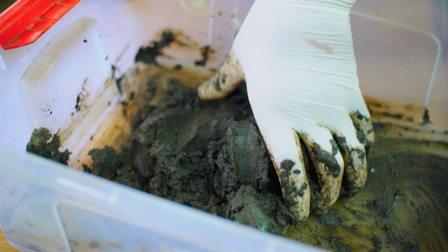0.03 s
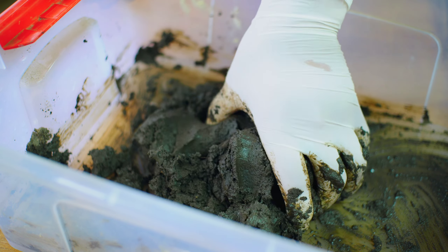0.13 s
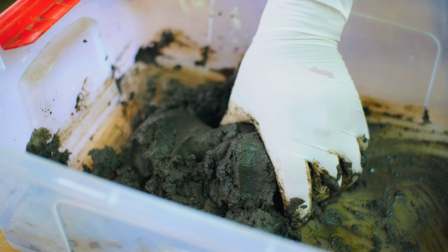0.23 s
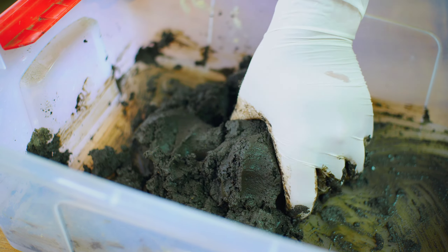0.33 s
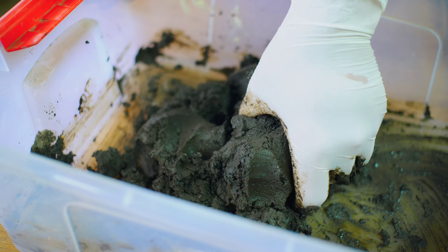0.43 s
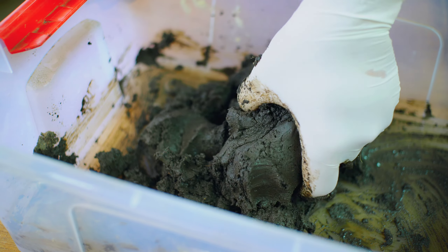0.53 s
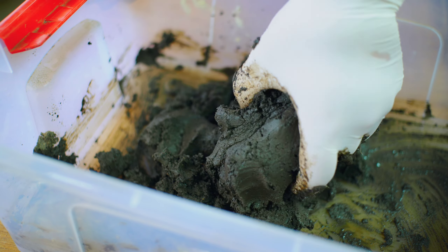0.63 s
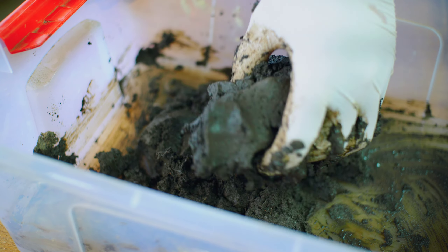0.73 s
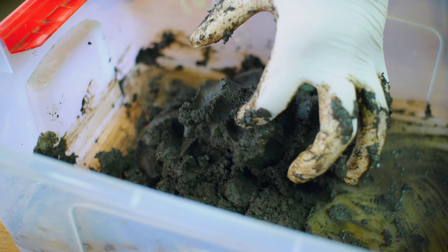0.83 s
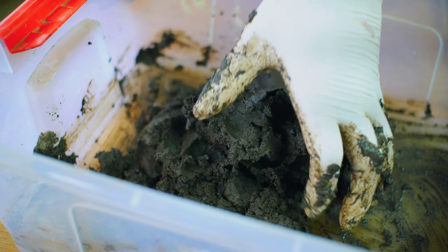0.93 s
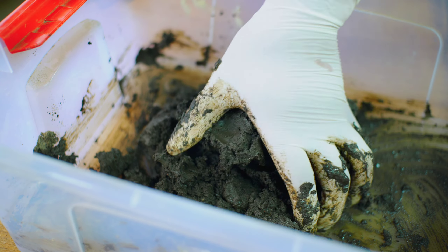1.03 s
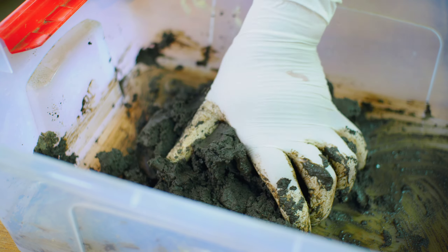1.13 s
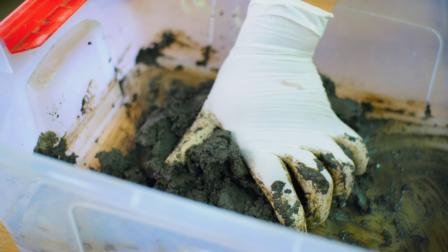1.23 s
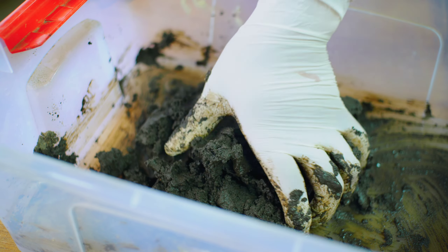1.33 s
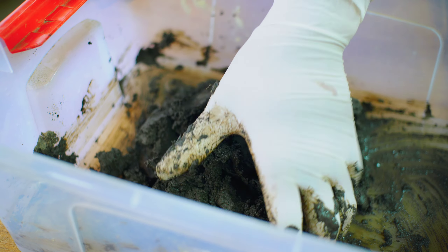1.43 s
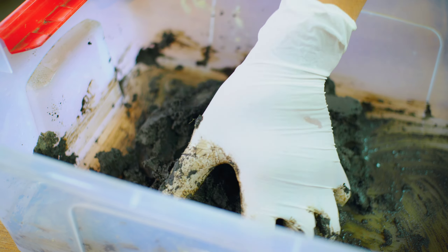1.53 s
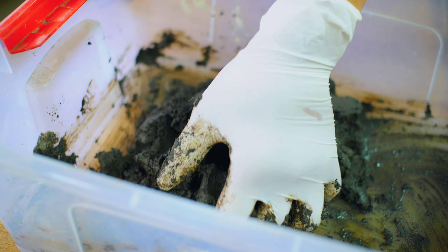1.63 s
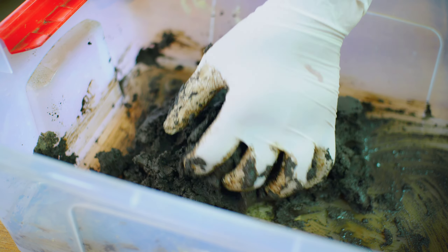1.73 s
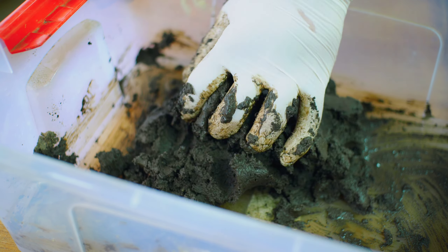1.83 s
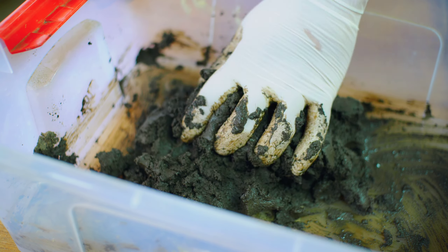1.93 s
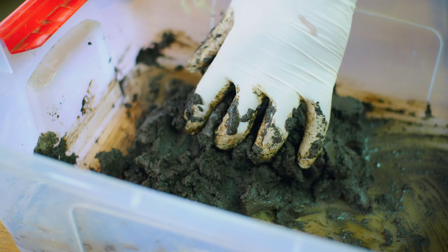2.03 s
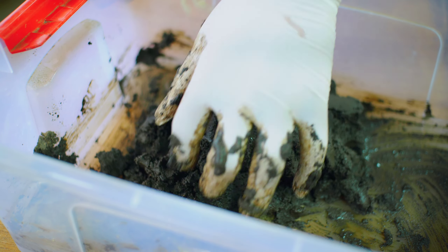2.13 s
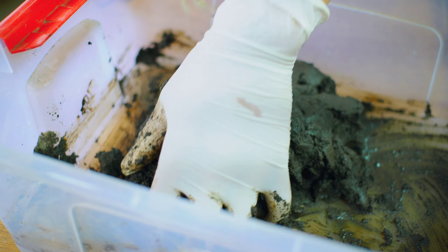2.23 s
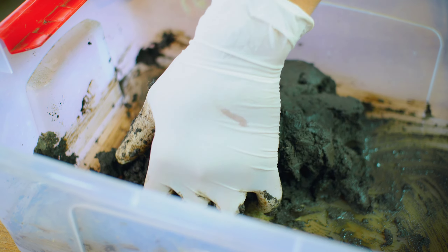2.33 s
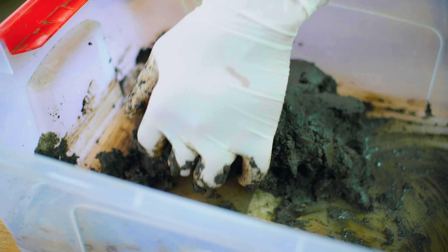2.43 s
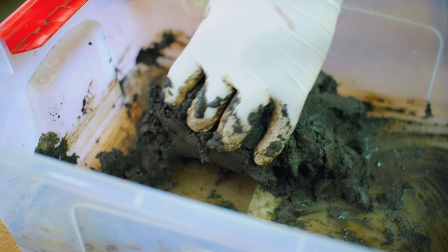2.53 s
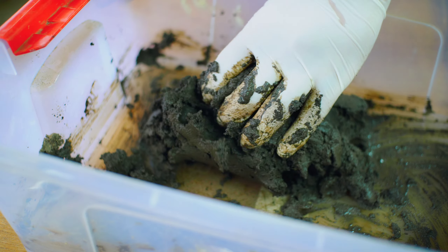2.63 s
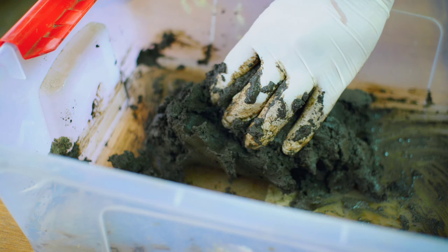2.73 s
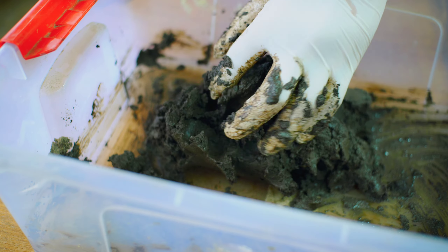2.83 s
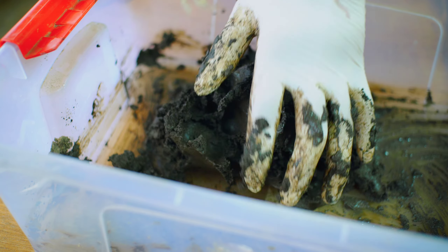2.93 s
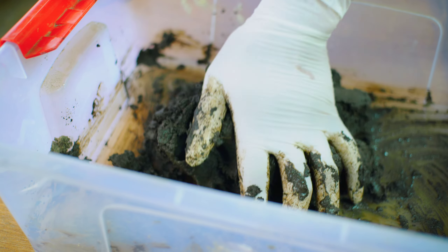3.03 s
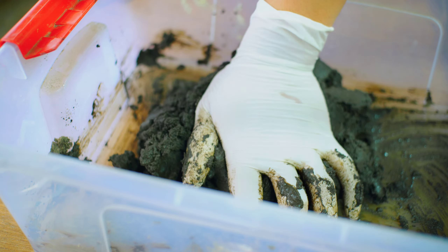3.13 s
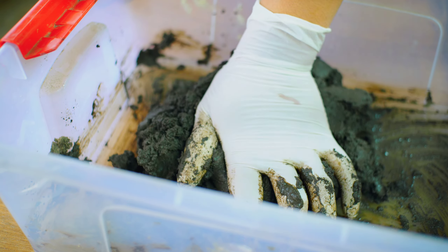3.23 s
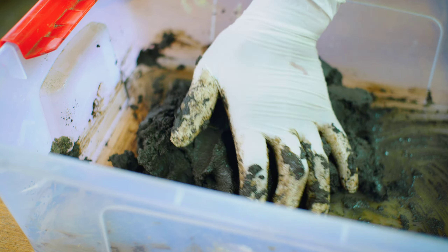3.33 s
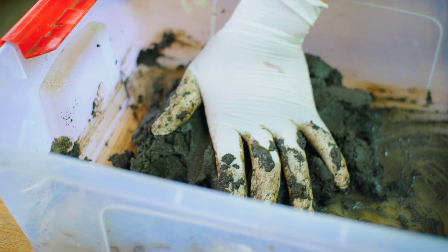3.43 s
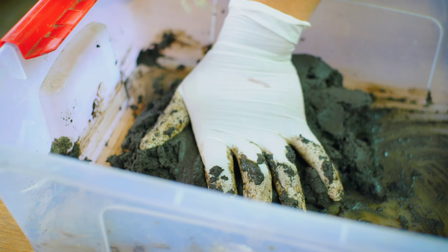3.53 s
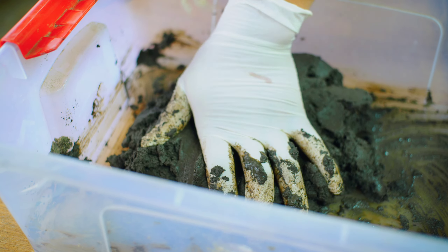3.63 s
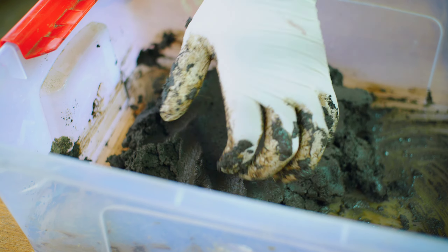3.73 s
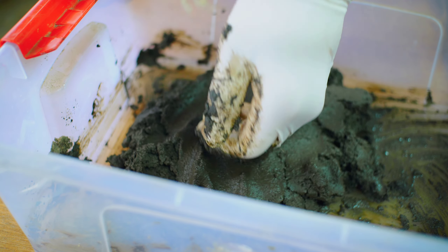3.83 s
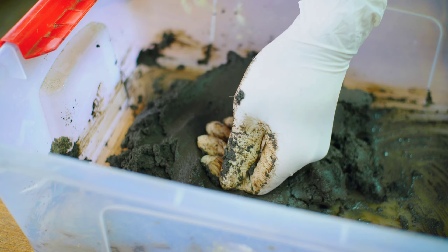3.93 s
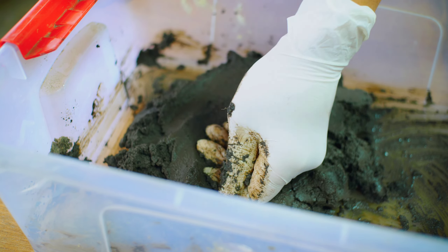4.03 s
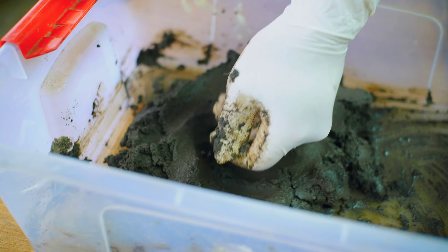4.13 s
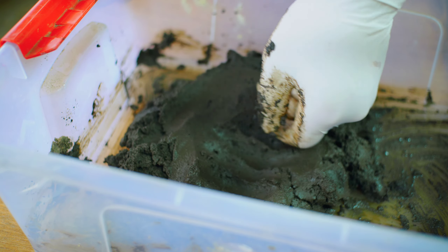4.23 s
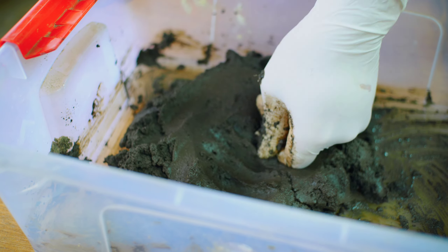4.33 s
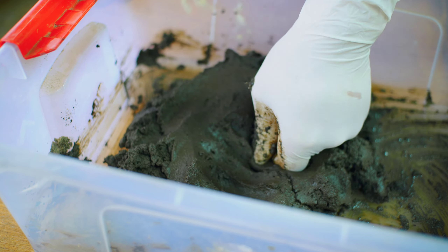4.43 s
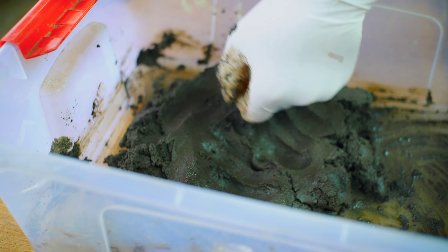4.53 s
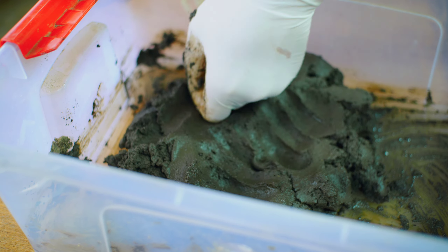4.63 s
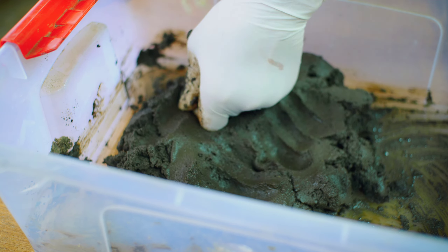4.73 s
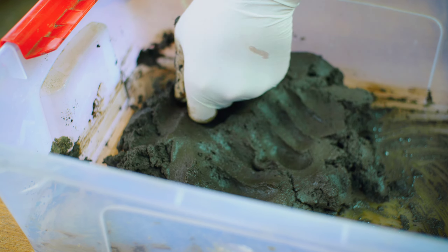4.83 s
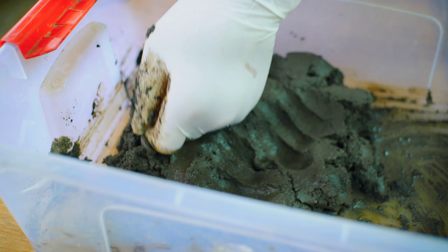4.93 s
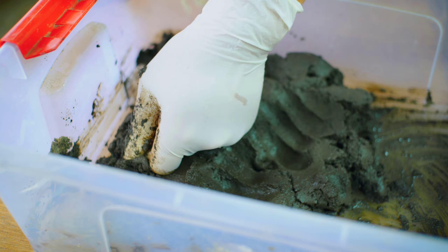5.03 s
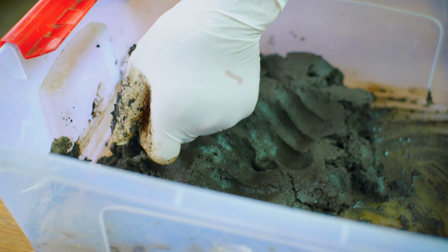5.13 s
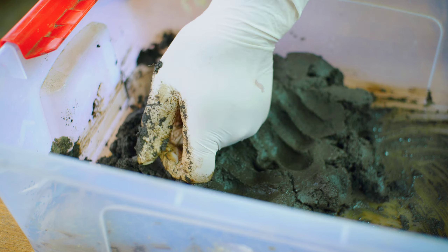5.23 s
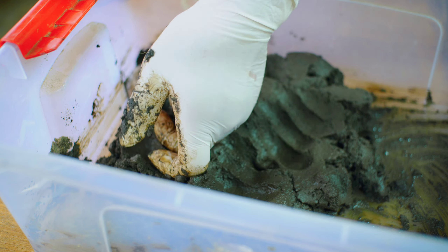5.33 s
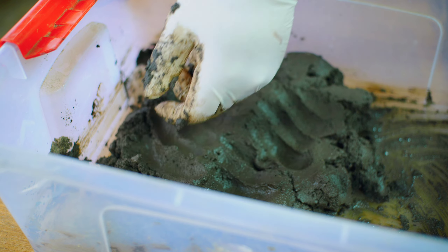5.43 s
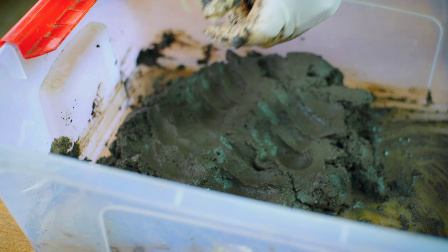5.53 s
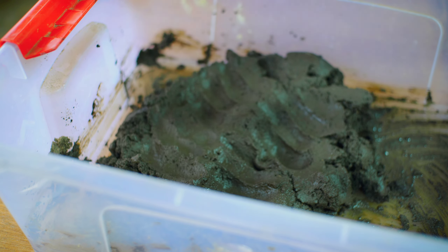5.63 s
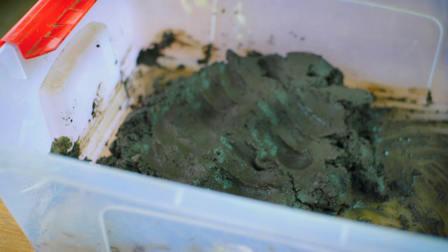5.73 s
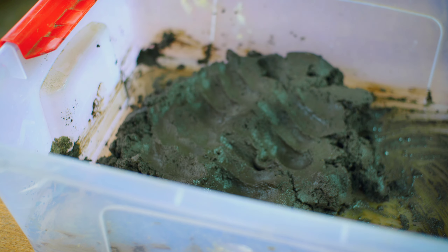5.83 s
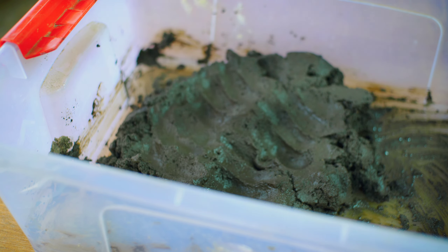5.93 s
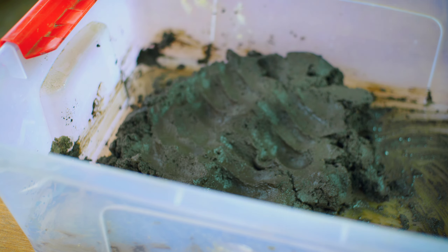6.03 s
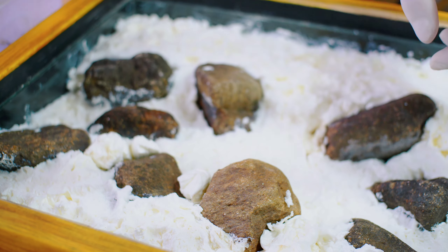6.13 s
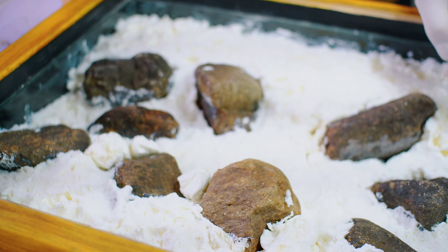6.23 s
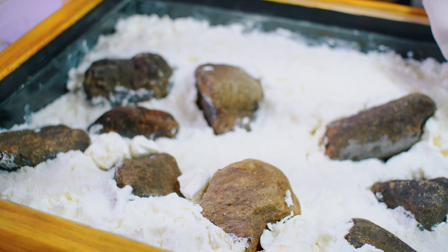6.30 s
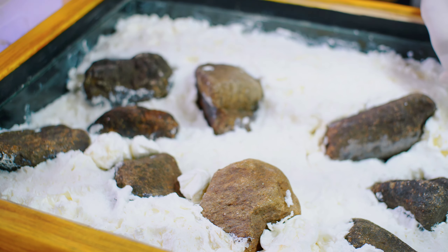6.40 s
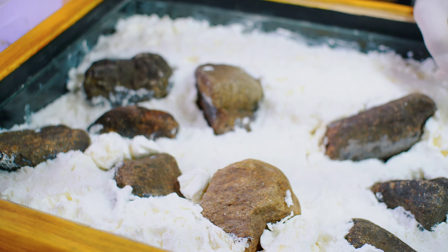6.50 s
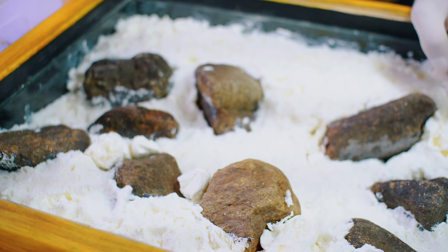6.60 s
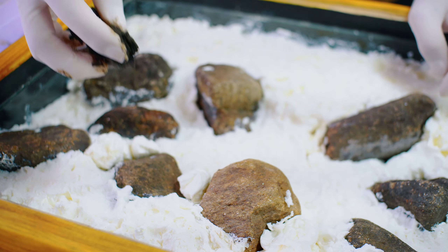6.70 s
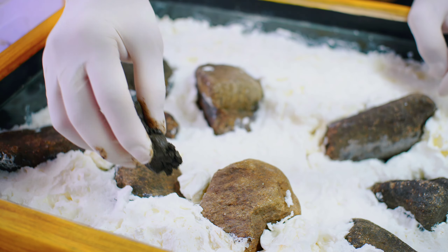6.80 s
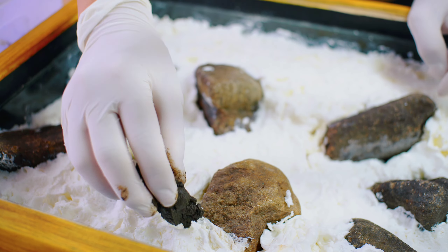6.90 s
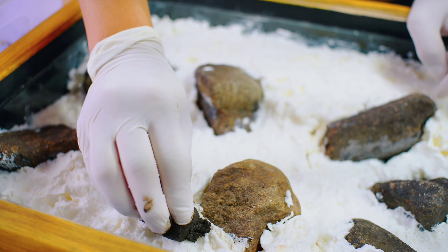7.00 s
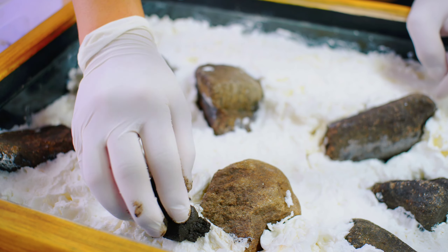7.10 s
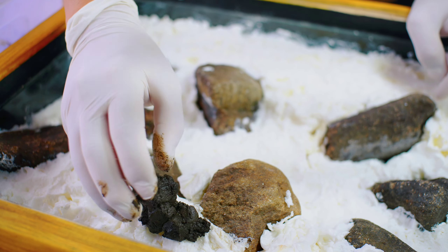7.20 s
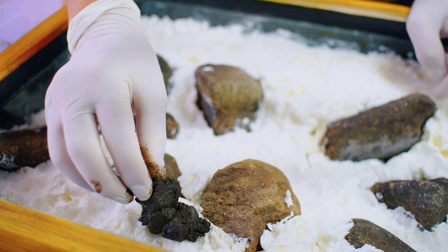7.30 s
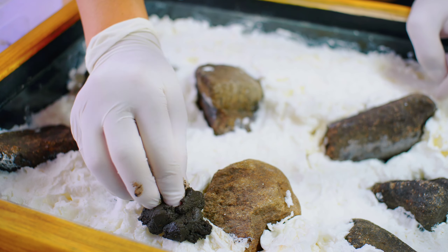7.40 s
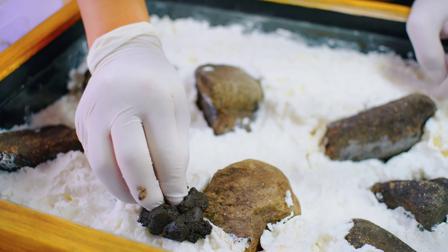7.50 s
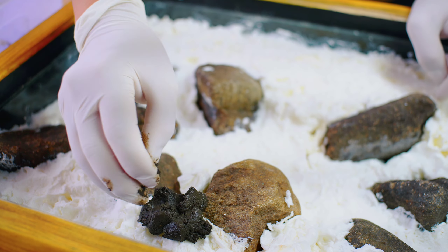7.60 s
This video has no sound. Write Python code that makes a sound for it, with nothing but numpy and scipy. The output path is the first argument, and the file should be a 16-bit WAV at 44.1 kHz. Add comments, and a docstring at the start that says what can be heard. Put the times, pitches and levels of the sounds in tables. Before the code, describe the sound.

Gritty soil is squeezed and pushed around a plastic tub, very near two microphones indoors. Light scraping and scattered clicks lead to a denser burst of snapping grit, hollow tub knocks and a low bump. Squelchy crunches follow, then four short, bright pressing crunches with gaps between. The grinding stops, leaving soft airy room noise, sparse ticks and very faint crumbling.

```python
"""Sand grains grind and crackle and single stones snap as a gloved hand kneads damp sandy soil in a plastic
tub, then presses it flat with the knuckles, close to two microphones. Grains, stones and soil pops are short
damped sines; scrapes, knocks and weight excite resonances of the tub walls and floor; the tub rocks with low
pushes. A small quiet room answers with decaying noise, over slowly swelling and sinking air and hiss."""
import sys
import numpy as np
from scipy import signal
from scipy.fft import rfft, irfft, next_fast_len
from scipy.io import wavfile
from scipy.ndimage import uniform_filter1d, map_coordinates

SR = 44100
rng = np.random.default_rng(int(sys.argv[2]) if len(sys.argv) > 2 else 0)


def transcribe(signal):
    """Save signal, clipped to [-1, 1], as a 16-bit WAV file at the path in sys.argv[1]."""
    frames = np.atleast_2d(signal).T
    limited = np.clip(frames, -1, 1)
    pcm = np.round(limited * 32767).astype(np.int16)
    wavfile.write(sys.argv[1], SR, pcm)


N = 337806

# Strokes of the hand. Each row: peak time in seconds, grinding level in dB, rise in seconds, fall in seconds,
# wall scrape in dB re grinding, dry fizz in dB re grinding.
STROKES = [(0.012, -41, 0.021, 0.062, -8, -4), (0.12, -44.5, 0.017, 0.041, 2.5, -28),
           (0.248, -49, 0.25, 1, -0.5, -19), (0.35, -48.5, 0.4, 0.089, -5, 4),
           (0.559, -39, 0.19, 0.29, -4, 0), (0.68, -44, 0.51, 0.15, -29, 1),
           (0.864, -45, 0.041, 0.19, -29, 0), (1.177, -41, 0.082, 0.045, 2, -1.5),
           (1.1, -52.5, 0.052, 0.075, 3, -8), (1.27, -45, 0.22, 0.13, -3, -3.5),
           (1.418, -35, 0.062, 0.091, -5, -2.5), (1.558, -37, 0.002, 0.043, 6, -21),
           (1.659, -36.5, 0.12, 0.11, -0.5, -5.5), (1.795, -40.5, 0.039, 0.25, -8, -0.5),
           (1.86, -41, 0.18, 0.21, -8, -1.5), (2.179, -43, 0.14, 0.071, -8, -2.5),
           (2.344, -43.5, 0.012, 0.27, 6, -22), (2.428, -40.5, 0.13, 0.31, -8, -2),
           (2.61, -49, 0.28, 0.25, -26, 5), (2.776, -29.5, 0.097, 0.12, -3, -11.5),
           (2.92, -48, 0.042, 0.052, -20, 4.5), (3.2, -46, 0.23, 0.48, -5.5, -5.5),
           (3.366, -39.5, 0.02, 0.11, -11.5, -1.5), (3.413, -31.5, 0.065, 0.025, -9.5, -3.5),
           (3.639, -48.5, 0.31, 0.087, -3, -3), (3.758, -30, 0.046, 0.054, -5.5, -6),
           (3.8, -44.5, .03, 0.15, -6, -12), (4.09, -50, 0.34, 0.14, -3, -3.5),
           (4.231, -34.5, 0.043, 0.038, -12.5, -5.5), (4.3, -54.5, 0.22, 0.22, -9, -7),
           (4.46, -53.5, 0.066, 0.16, -7.5, -1.5), (4.61, -31, 0.044, 0.047, -15.5, -3.5),
           (4.72, -51.5, 0.14, 0.38, -3.5, 0.5), (4.805, -46, 0.037, 0.085, -1.5, -21),
           (4.946, -36, 0.054, 0.055, -11.5, -4), (5.1, -52, 0.22, .4, -6.5, -10)]
# Tub wall resonances. Each row: centre in Hz, width in Hz, relative level in dB.
TUB_WALLS = [(992, 257, 1), (1560, 146, 1), (1833, 235, 3), (2535, 290, 0.5)]
# Tub floor resonances. Each row: centre in Hz, width in Hz, relative level in dB.
TUB_FLOOR = [(151, 20, -2), (205, 37, -2.5), (256, 51, -4), (402, 45, -7.5), (587, 114, -6)]
# Spectrum of dry ticks. Each row: frequency in Hz, relative level in dB per Hz.
FIZZ_SPECTRUM = [(3000, -14), (6000, 3), (9200, 2.5), (12500, 0), (15600, -7)]

FLANK_DB = 20  # a stroke swells and dies by this much in its rise and fall times
REST_DB, REST_SCRAPE_DB, REST_FIZZ_DB = -80, 8, -16  # resting hand: grinding; scrape and fizz re grinding
LIFT_S, LIFT_TAKES_S = 5.32, 0.097  # the hand has left the tub; its fade before that
WEIGHT_GROWS = 1.77  # dB of weight per dB of scrape
SMALL_SNAP_DB, SMALL_SNAP_HZ, SMALL_SNAP_SPREAD = 6.5, 4540, 0.34  # mean level re grinding, pitch, ln-pitch sd
SMALL_SNAP_TOP_DB = -44  # grinding above this makes chance snaps no louder
TOP_HZ = 15650


def amp(db):
    """Decibels to gain."""
    return 10 ** (np.asarray(db) / 20)


def unit(x):
    """x at rms 1."""
    return x / np.sqrt(np.mean(x ** 2) + 1e-20)


def along(points, hz):
    """(Hz, value) points read on a log-frequency axis."""
    f, v = np.transpose(points)
    return np.interp(np.log(hz + 1), np.log(f + 1), v)


def wobble(rate):
    """A smooth random curve, rate knots a second."""
    knots = rng.standard_normal(int(N * rate / SR) + 4)
    return map_coordinates(knots, [np.arange(N) * rate / SR])


def filtered(x, response):
    """x times a complex response of frequency."""
    m = next_fast_len(N + SR // 2)
    return irfft(rfft(x, m) * response(np.fft.rfftfreq(m, 1 / SR)), m)[..., :N]


def resonant(x, modes):
    """x through parallel (Hz, width Hz, dB) band-pass resonances of alternating sign."""
    def response(f):
        total = 0
        for k, (centre, width, db) in enumerate(modes):
            damping = 1j * f * width
            total = total + (-1) ** k * amp(db) * damping / (centre * centre - f * f + damping)
        return total
    return filtered(x, response)


def rings(start, gain, hz, cycles, size):
    """Sum of damped sines: swell time constant half a cycle, 1/e decay in the given cycles."""
    k = np.arange(size)
    turns = hz[:, None] * k / SR
    envelope = (1 - np.exp(-2 * turns)) * np.exp(-turns / cycles)
    wave = gain[:, None] * np.sin(2 * np.pi * turns) * envelope
    wave = wave * np.cos(np.pi * k / size / 2)  # ends at zero
    at = (start * SR).astype(int)[:, None] + k
    return np.bincount(at.ravel(), wave.ravel(), N + size)[:N]


def impacts(count, tail_db):
    """Grain contacts: random times and signed sizes, most small and a few large."""
    draw = rng.random((count, 3))
    size_db = np.minimum(-tail_db * np.log(1 - draw[:, 2]), 5 * tail_db)
    return draw[:, 0] * (N - 1) / SR, np.sign(draw[:, 1] - .5) * amp(size_db)


def ticks(count, tail_db):
    """Contacts as single-sample pushes."""
    at, size = impacts(count, tail_db)
    return np.bincount((at * SR).astype(int), size, N)


def patchy(x, depth_db):
    """The shape of hand and soil keeps changing, so resonances come and go in time-frequency patches."""
    z = signal.stft(x, nperseg=256)[2]
    field = uniform_filter1d(rng.standard_normal(z.shape), 4, 0)
    field = uniform_filter1d(field, 24, 1)
    return signal.istft(z * amp(depth_db * unit(field)), nperseg=256)[1][:N]


def effort():
    """Gain of every stroke over time, one row each, the resting hand last."""
    s, db, rise, fall = np.transpose(STROKES)[:4, :, None]
    t = np.arange(0, N, 64) / SR
    flank = np.where(t < s, (s - t) / np.abs(rise), (t - s) / np.abs(fall))
    rows = np.vstack([amp(db - FLANK_DB * flank), amp(REST_DB) + 0 * t])
    return t, rows * np.clip((LIFT_S - t) / LIFT_TAKES_S, 0, 1)


def pressed(re_db, rest_db):
    """Gain per sample of one layer: powers of all strokes summed, each at its own share."""
    t, rows = effort()
    power = amp(2 * np.append(re_db, rest_db)) @ rows ** 2
    return np.interp(np.arange(N) / SR, t, np.sqrt(power))


def spread(x, alike, other):
    """Two microphones: a second signal enters them in opposite sign, as far as they are unalike."""
    turn = lambda hz: np.arccos(np.clip(along(alike, hz), -1, 1)) / 2
    mid = filtered(x, lambda hz: np.cos(turn(hz)))
    side = filtered(other, lambda hz: np.sin(turn(hz)))
    return np.array([mid + side, mid - side])


def kneading():
    """Grains slip in clumps: they ring a few cycles in the hollow, spit dry ticks and shake walls and floor."""
    # Median grain pitch. Each row: time in seconds, pitch in Hz.
    grain_pitch = [(0.0, 4400), (0.2, 3860), (0.68, 4710), (1.1, 3700), (1.56, 3580), (2.17, 4980),
                   (2.35, 3880), (3.2, 4210), (5.3, 4750)]
    # Air in the tub. Each row: centre in Hz, width in Hz, resonance gain in dB.
    hollow_modes = [(2570, 100, -31), (3200, 68, 5.5), (3610, 870, -8), (4230, 510, 7.5),
                    (7000, 2140, -1.5)]
    # Weight on the tub floor. Each row: time in seconds, level in dB re grinding before the scrape's share.
    floor_weight = [(0, -11), (0.6, -6.5), (1.2, -11.5), (2.3, -10), (3.0, -2), (3.7, -10.5), (4.4, -11.5),
                    (5.302, -7)]
    scrape_db, fizz_db = np.transpose(STROKES)[4:]
    clumps = amp(0.6 * wobble(35) + 2.2 * wobble(200))

    at, size = impacts(count=16000, tail_db=2.5)
    pitch_hz = np.interp(at, *np.transpose(grain_pitch)) * np.exp(0.29 * rng.standard_normal(len(at)))
    grains = clumps * rings(at, size, np.clip(pitch_hz, 500, 12000), cycles=3.5, size=128)
    grind = unit(0.87 * grains + resonant(grains, hollow_modes))

    dry_ticks = clumps * ticks(count=60000, tail_db=2.5)
    fizz = unit(filtered(dry_ticks, lambda hz: amp(along(FIZZ_SPECTRUM, hz))))
    scrape = unit(resonant(clumps * ticks(count=9000, tail_db=1.0), TUB_WALLS))
    weight = unit(resonant(amp(0.52 * wobble(48)) * ticks(count=4000, tail_db=2.5), TUB_FLOOR))

    body = pressed(0 * scrape_db, 0) * grind + pressed(scrape_db, REST_SCRAPE_DB) * scrape
    load = pressed(WEIGHT_GROWS * scrape_db, WEIGHT_GROWS * REST_SCRAPE_DB)
    load = load * amp(np.interp(np.arange(N) / SR, *np.transpose(floor_weight)))
    out = patchy(body, depth_db=2.0)
    out = out + pressed(fizz_db, REST_FIZZ_DB) * patchy(fizz, depth_db=2.5)
    return out + load * weight


def room_tone():
    """Slowly swelling and sinking air and microphone hiss: shaped noise, partly shared by the microphones."""
    # Noise spectrum. Each row: frequency in Hz, relative level in dB per Hz.
    air_spectrum = [(25, -21), (60, -41), (115, -43), (190, -27), (290, -24.5), (600, -13), (1400, -8.5),
                    (2500, -8), (5000, -11), (15500, -19.5)]
    # Each row: frequency in Hz, left-right likeness (0-1).
    air_alike = [(60, 1), (300, 0.58), (2000, 0.53), (15000, 0.023)]
    # Each row: time in seconds, mean level in dB.
    tone_level = [(0, -57), (5.3, -56), (6, -58), (6.22, -55.5), (6.36, -59.5), (7.66, -59.5)]
    a, b = filtered(rng.standard_normal((2, N)), lambda hz: amp(along(air_spectrum, hz)))
    level_db = np.interp(np.arange(N) / SR, *np.transpose(tone_level))
    return amp(level_db + 0.2 * wobble(5.1)) * unit(spread(a, air_alike, b))


def snaps():
    """A snap is a short ring at its pitch, a few scattered splinters and a crack; small ones come by chance."""
    # Loud stones and clods. Each row: start in seconds, ring level in dB, pitch in Hz.
    loud_snaps = [(0.0074, -18, 7800), (0.0184, -18, 7000), (0.0227, -23.5, 4770), (0.0752, -31, 7540),
                  (0.113, -20.5, 2980), (0.1415, -29, 1800), (0.2252, -25, 4100), (0.2409, -18, 3820),
                  (0.286, -26.5, 7000), (0.4365, -21, 7800), (0.5448, -30, 1700), (0.5692, -22.5, 1750),
                  (0.6499, -27, 4250), (0.69, -33, 3800), (0.771, -23, 4170), (0.858, -24.5, 3440),
                  (1.0685, -37, 1760), (1.14, -30, 2280), (1.16, -26, 2220), (1.239, -22.5, 5100),
                  (1.283, -26.5, 3000), (1.3568, -40, 10000), (1.3917, -12.5, 3540), (1.414, -13, 5130),
                  (1.4337, -15, 4470), (1.472, -19, 5340), (1.555, -10, 3160), (1.5659, -19.5, 2340),
                  (1.636, -13.5, 2700), (1.7863, -23, 6900), (1.8422, -19, 2860), (1.905, -25, 5400),
                  (2.0103, -23.5, 4760), (2.108, -36, 8790), (2.168, -18, 5270), (2.195, -21, 5200),
                  (2.3417, -17.5, 2460), (2.36, -33, 2470), (2.3968, -24, 1980), (2.4921, -22.5, 1470),
                  (2.5057, -19, 9200), (2.598, -15.5, 5700), (2.6569, -21, 4100), (2.6782, -19.5, 4270),
                  (2.736, -28, 1490), (2.9237, -16.5, 4700), (2.944, -28, 4530), (3.0864, -31, 4276),
                  (3.142, -25.5, 4440), (3.1622, -24, 4870), (3.187, -29, 5000), (3.243, -22.5, 6860),
                  (3.295, -29, 5020), (3.3626, -20, 4160), (3.41, -11, 6000), (3.4166, -15, 5000),
                  (3.5445, -31, 4500), (3.765, -5.5, 4720), (4.0088, -28.5, 4900), (4.186, -26, 5760),
                  (4.2123, -18.5, 5270), (4.2236, -13, 4500), (4.231, -15.5, 4420), (4.357, -23.5, 5540),
                  (4.4337, -27, 5300), (4.4535, -30, 6070), (4.6164, -9.5, 4800), (4.7216, -24, 5500),
                  (4.74, -21.5, 5560), (4.8014, -16.5, 4740), (4.8106, -21, 4600), (4.8752, -30, 6000),
                  (4.918, -26, 6200), (4.9514, -7.5, 4630), (5.108, -25, 4300), (5.4864, -26, 4650),
                  (5.8195, -32, 2240), (6.4038, -41, 4260), (6.5387, -25.5, 4300), (7.029, -45, 2830),
                  (7.0475, -37.5, 4080), (7.2284, -38, 1900), (7.252, -40, 2210), (7.3325, -42.5, 3900)]
    chance = rng.standard_normal((60, 2))
    when = LIFT_S * rng.random(len(chance))
    grinding = pressed(np.zeros(len(STROKES)), 0)[(when * SR).astype(int)]
    small_hz = SMALL_SNAP_HZ * np.exp(SMALL_SNAP_SPREAD * chance[:, 0])
    small_gain = np.minimum(grinding, amp(SMALL_SNAP_TOP_DB)) * amp(SMALL_SNAP_DB + 2.7 * chance[:, 1])

    s, db, hz = np.transpose(loud_snaps)
    s, hz = np.append(s, when), np.append(hz, small_hz)
    gain = np.append(amp(db), small_gain)
    out = rings(s, gain, hz, cycles=2.8, size=300)
    for splinter in range(5):
        draw = rng.standard_normal((len(s), 2))
        late_s = s + 0.0018 * abs(draw[:, 0])
        out += rings(late_s, 0.15 * gain, hz * np.exp(0.2 * draw[:, 1]), cycles=4, size=200)

    crack = np.zeros(N + 600)
    decay = np.exp(-np.arange(600) / SR / .002)  # 2 ms
    for at, level, hiss in zip(s, gain * amp(-12.5), rng.standard_normal((len(s), 600))):
        crack[int(at * SR):][:600] += level * hiss * decay
    return out + resonant(crack[:N], [(4520, 4200, 0.019)])


def room(x):
    """Two unrelated noise tails, 150 samples late; each frequency dies at its own speed."""
    # Each row: frequency in Hz, 60 dB decay time in seconds.
    decay_times = [(200, 0.66), (2500, 0.18), (5000, 0.21), (12000, 0.085)]
    hz, t, z = signal.stft(rng.standard_normal((2, SR // 2)), SR, nperseg=256)
    decay = amp(-60 * t / along(decay_times, hz)[:, None])
    tail = signal.istft(z * decay, SR, nperseg=256)[1]
    late = np.pad(x, (150, 0))[None]
    return signal.fftconvolve(late, tail / np.linalg.norm(tail[0]), axes=1)[:, :N]


def knocks():
    """A soft fingertip on the tub: a short low ring that also shakes walls and floor."""
    # Each row: start in seconds, ring level in dB, pitch in Hz.
    finger_knocks = [(0.113, -32, 760), (0.244, -35, 750), (1.038, -33, 900), (1.105, -35, 576),
                     (1.123, -24.5, 423), (1.39, -33.5, 756), (1.554, -23.5, 750), (1.566, -29, 750),
                     (1.636, -24.5, 900), (2.3271, -11.5, 800), (2.341, -16, 910), (2.396, -26, 750),
                     (3.726, -28.5, 610)]
    s, db, hz = np.transpose(finger_knocks)
    blows = rings(s, amp(db), hz, cycles=0.42, size=400)
    return blows + 1.8 * resonant(blows, TUB_WALLS) + 9.7 * resonant(blows, TUB_FLOOR)


def crunches():
    """Soil gives way in pops that swell and thin out; gritty runs ring shorter, spit ticks, shake the walls."""
    # Runs, wet and narrow or gritty and broad. Each row: start in seconds, length in seconds,
    # level in dB before scaling by length and pitch, pitch in Hz, pitch spread (0-1, sd of ln pitch).
    crunch_runs = [(0.284, 0.083, -48, 4030, 0.05), (0.496, 0.065, -44, 6230, 0),
                   (0.529, 0.11, -45.5, 1850, 0.16), (1.379, 0.027, -36, 3360, 0.22),
                   (1.414, 0.012, -28, 4500, 0.23), (1.5545, 0.005, -34, 3220, 0),
                   (1.562, 0.0063, -37, 4020, 0.35), (1.634, 0.0041, -26, 3300, 0.32),
                   (2.177, 0.048, -55, 5100, 0), (2.204, 0.14, -62, 2470, 0),
                   (2.325, 0.009, -41, 5000, 0.38), (2.326, 0.0076, -30, 1010, 0.08),
                   (2.338, 0.0064, -36.5, 2450, 0.28), (2.397, .006, -39, 5500, 0.3),
                   (2.372, .16, -53.5, 577, 0.07), (2.471, 0.041, -43, 1450, 0.05),
                   (2.721, 0.15, -35, 1447, 0.04), (2.709, 0.19, -43.5, 589, 0),
                   (2.737, 0.11, -34.5, 3860, 0.2), (2.906, 0.046, -44, 4740, 0.14),
                   (3.203, 0.094, -44, 4460, 0.56), (3.357, 0.032, -36.5, 3950, 0),
                   (3.726, 0.019, -33.5, 1870, 0.04), (3.731, 0.039, -31.5, 4860, 0.26),
                   (3.779, 0.087, -51, 4600, 0.06), (4.047, 0.1, -57, 2310, 0.12),
                   (4.628, 0.14, -53.5, 3050, 0.03), (4.626, 0.13, -57, 4530, 0),
                   (4.22, 0.026, -30, 4760, 0.25), (4.594, 0.025, -28, 3790, 0.18),
                   (4.743, 0.077, -61, 1000, 0.05), (4.941, .014, -31.5, 4550, 0.38),
                   (4.947, .009, -40, 1070, 0.07), (5.067, 0.094, -56, 2020, 0.14),
                   (5.189, 0.067, -46, 6600, 0.33), (5.304, 0.024, -54.5, 4800, 0.28),
                   (5.37, 0.013, -58, 5000, 0.24), (5.471, 0.031, -48.5, 4160, 0.62),
                   (5.778, 0.028, -49.5, 2060, 0.43), (5.809, 0.018, -46.5, 2190, 0.37),
                   (7.043, 0.057, -57.5, 2660, 0.34), (7.219, 0.045, -53, 1990, 0.2),
                   (7.231, .12, -59, 2050, 0.24), (7.218, 0.068, -57.5, 4540, 0.31),
                   (7.616, 0.038, -55, 6850, 0.46)]
    pops, grit = np.zeros(N), np.zeros(N)
    for s, length, db, hz, pitch_spread in crunch_runs:
        at = s + length * rng.beta(1.3, 1.9, size=90)
        draw = rng.standard_normal((90, 3))
        size = amp(db + 4 * draw[:, 0]) * np.sqrt(length * hz / 120)  # larger pops in long or high runs
        pop_hz = np.minimum(hz * np.exp(pitch_spread * draw[:, 1]), 14000)
        pops += rings(at, size, pop_hz, cycles=5.5 - 7.2 * min(pitch_spread, .7), size=400)
        grit += np.bincount((at * SR).astype(int), pitch_spread * size * draw[:, 2], N)[:N]
    spit = filtered(grit, lambda hz: amp(along(FIZZ_SPECTRUM, hz)))
    return pops + 5.0 * spit + 3 * resonant(grit, TUB_WALLS)


def thuds():
    """One low push, almost without ring, each time the tub rocks on the table."""
    # Each row: start in seconds, push level in dB.
    tub_rocks = [(1.551, -49), (1.64, -58), (2.325, -45)]
    s, db = np.transpose(tub_rocks)
    return rings(s, amp(db), np.full(len(s), 110.), cycles=.35, size=2000)


def scene():
    """Grains break all over the tub, so the treble balance of the two microphones flickers."""
    # Each row: frequency in Hz, left-right likeness (0-1).
    hand_alike = [(200, 1), (2000, 0.99), (5000, 0.84), (9000, 0.53), (15000, 0.29)]
    hand = kneading() + crunches() + snaps() + knocks()
    near = spread(hand, hand_alike, hand * unit(wobble(530)))
    tails = room(hand)
    reverb = amp(-14.5) * (tails.mean(axis=0) + 0.37 * tails)
    bass_cut = lambda hz: (1j * hz / (1j * hz + 300)) ** 4  # small sources in a tub radiate little bass
    heard = filtered(near + reverb, bass_cut)
    return heard * amp([[.2], [-.2]]) + thuds() + room_tone()


def record(dry):
    """Steep zero-phase low-pass at the band limit."""
    return filtered(dry, lambda hz: 1 / (1 + (hz / TOP_HZ) ** 200))


dry = scene()
out = record(dry)
transcribe(out)
```